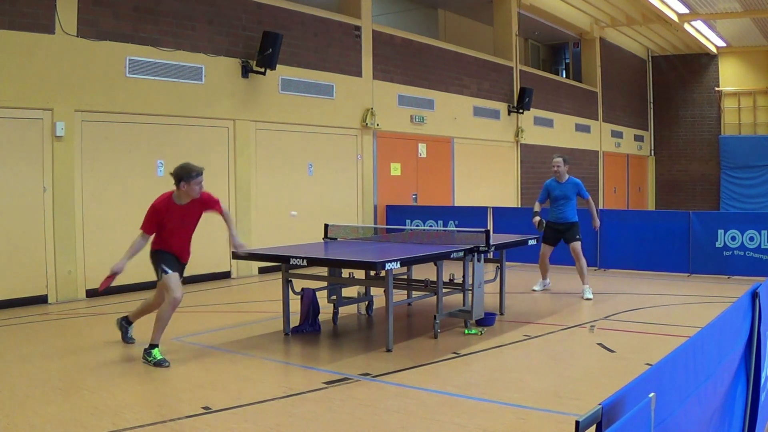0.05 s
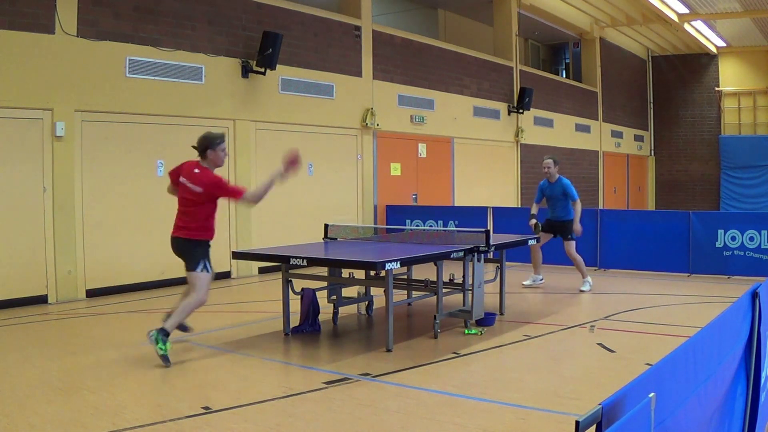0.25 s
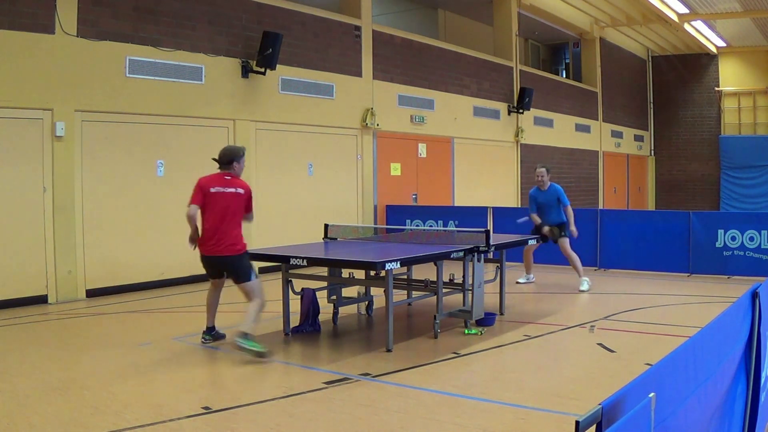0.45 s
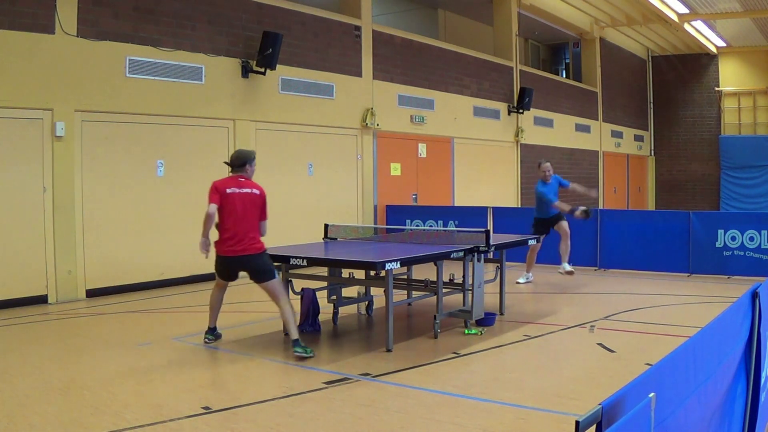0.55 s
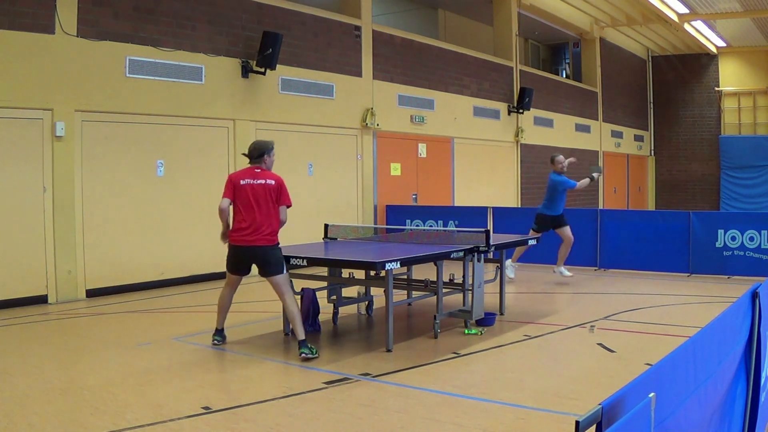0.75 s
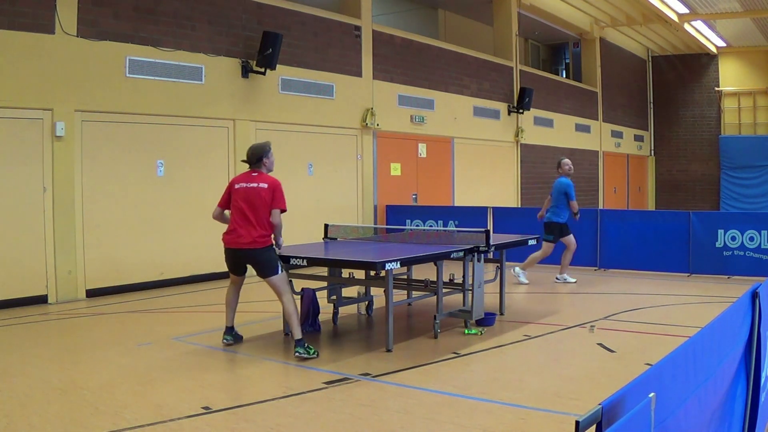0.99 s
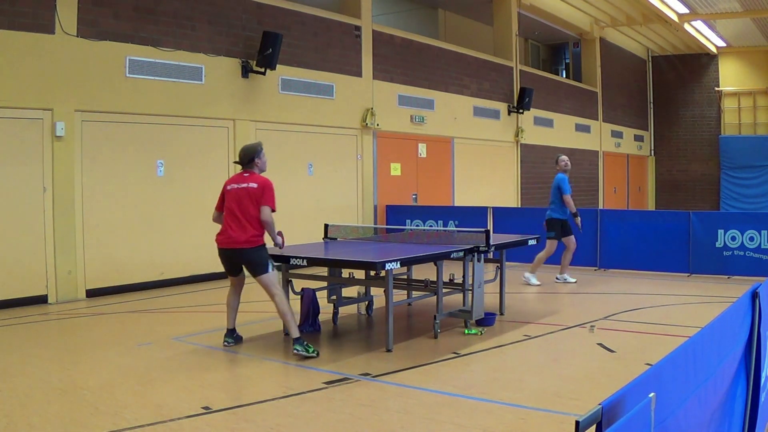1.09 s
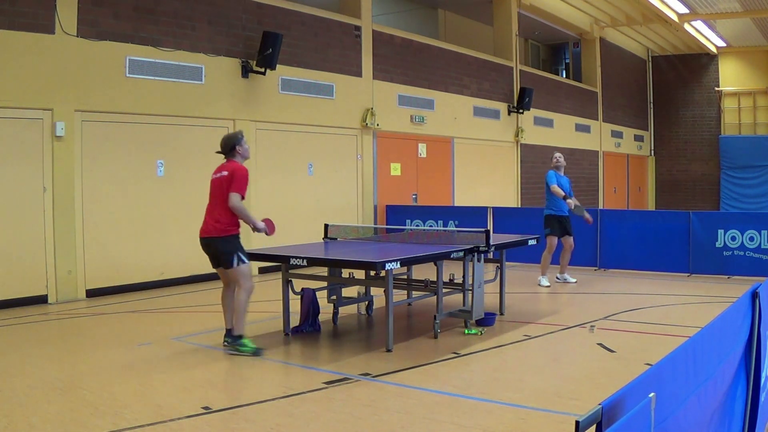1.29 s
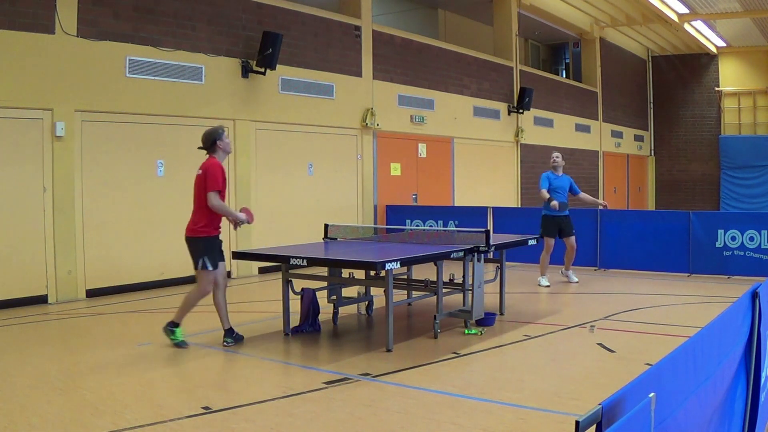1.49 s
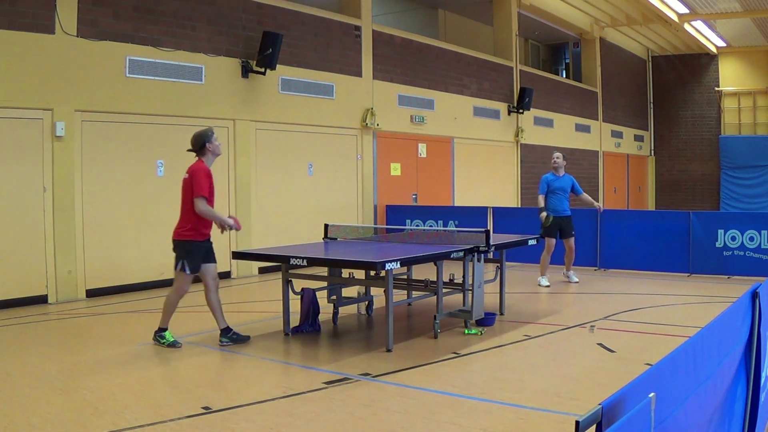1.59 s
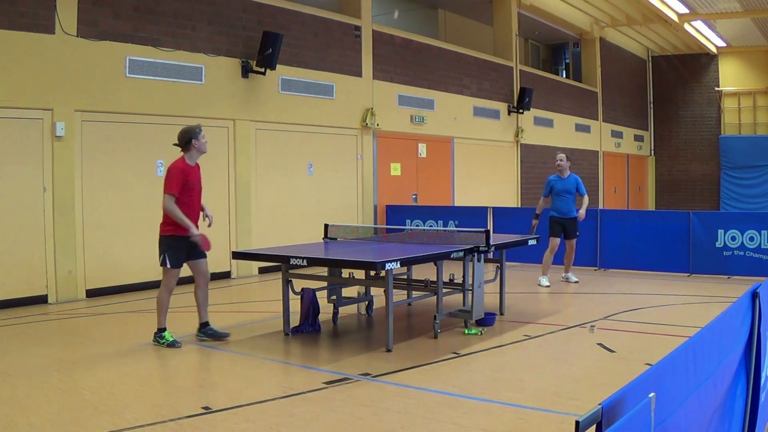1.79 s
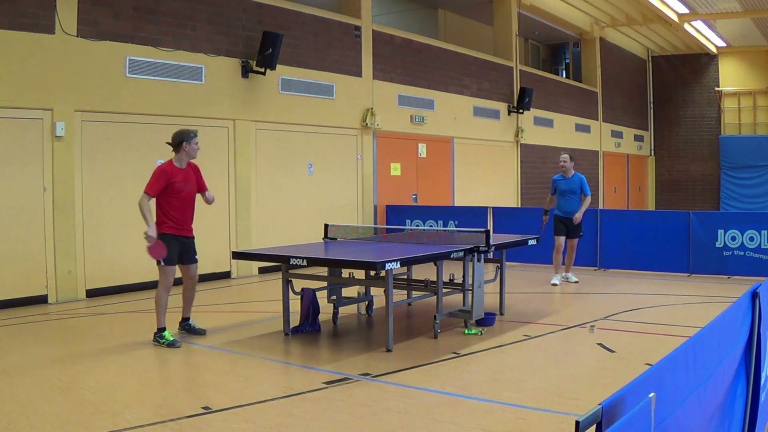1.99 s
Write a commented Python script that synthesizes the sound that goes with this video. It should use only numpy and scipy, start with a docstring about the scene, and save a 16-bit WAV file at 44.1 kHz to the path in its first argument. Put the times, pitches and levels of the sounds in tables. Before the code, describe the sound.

A table tennis ball clicks off a bat, bounces on the table and is hit back. Players' shoes squeak, scuff and land heavily on the floor, then ease into soft steps, all echoing around a sports hall.

```python
"""A table tennis ball is driven, skips off the table and is returned, in an echoing sports hall.
Each stroke rings the bat's wooden blade and the ball's shell, then slaps back off a wall.
Both players land heavily on the sprung floor; their rubber soles slap, squeak and scuff.
The hall rings on after everything, over the fading tail of earlier play, room tone and a thin whine."""
import sys
import numpy as np
from scipy import signal
from scipy.fft import rfft, irfft
from scipy.io import wavfile

SR = 44100
rng = np.random.default_rng(int(sys.argv[2]) if len(sys.argv) > 2 else 0)


def to_wav(s):
    """Save 16-bit WAV."""
    ch = np.atleast_2d(s).T  # columns
    pcm = np.round(np.clip(ch, -1, 1) * 32767)  # PCM
    wavfile.write(sys.argv[1], SR, pcm.astype(np.int16))


N = 90404
T = np.arange(N) / SR
BIN_HZ = np.fft.rfftfreq(N, 1 / SR)


def from_db(db):
    """Decibels to gain."""
    return 10 ** (np.asarray(db) / 20)


def unit_rms(x):
    """Scale to rms 1."""
    return x / np.sqrt(np.mean(x ** 2) + 1e-20)


def at_hz(curve, hz):
    """Read a curve on a log-frequency axis."""
    freqs, values = np.transpose(curve)
    return np.interp(np.log(hz + 1), np.log(freqs), values)


def noise(spectrum):
    """Steady noise of a given colour, rms 1."""
    return unit_rms(irfft(rfft(rng.standard_normal(N)) * from_db(at_hz(spectrum, BIN_HZ)), N))


def drift(rate_hz):
    """Smooth random modulation, rms 1."""
    lowpass = signal.butter(2, rate_hz, fs=SR, output="sos")
    return unit_rms(signal.sosfilt(lowpass, rng.standard_normal(N)))


def envelope(start, attack, decay):
    """Percussive rise and exponential tail."""
    age = np.maximum(T - start, 0)
    return (1 - np.exp(-age / attack)) * np.exp(-age / decay) + 1e-18


def contact(start, decay):
    """A short rough burst of force."""
    return 0.83 * envelope(start, 0.083 * decay, decay) * rng.standard_normal(N)


def resonate(x, hz, width_hz):
    """Two like resonators in series, each width_hz wide; keeps the energy of the drive."""
    radius, angle = np.exp(-np.pi * width_hz / SR), 2 * np.pi * hz / SR
    stage = [1, 0, -1, 1, -2 * radius * np.cos(angle), radius ** 2]
    return unit_rms(signal.sosfilt([stage, stage], x)) * np.sqrt(np.mean(x ** 2))


# Stereo image of the hall: (frequency [Hz], left-right correlation [0..1])
CORRELATION = [(60, .82), (130, .86), (300, .66), (600, .58), (1300, .54), (4000, .68), (10000, .72)]

def diffuse(mid, side):
    """Two unrelated noises become a stereo field, narrowest in the bass and treble."""
    alike = at_hz(CORRELATION, BIN_HZ)
    centre = rfft(mid) * np.sqrt((1 + alike) / 2)
    spread = rfft(side) * np.sqrt((1 - alike) / 2)
    return irfft(centre + spread * [[1], [-1]], N)


# Colours of the leading reverb tail and the room tone: (frequency [Hz], spectral level [dB])
TAIL_EQ = [(24, -47), (40, -10), (211, -4.5), (284, -11.5), (382, -1), (454, 1.5), (514, -4), (1230, 4),
           (4340, -20), (9840, -20), (15000, -37)]
AIR_EQ = [(18, -33), (30, 1), (288, 0.5), (978, -21), (1650, -3.5), (4310, -36), (4900, -32),
          (6360, -13), (15000, -23)]

def background(tail_db=-34, fade_db_per_s=34, air_db=-57.5, whine_hz=15625, whine_db=-67):
    """The bed: the fading ring of earlier play, the air of the hall and a faint electrical whine."""
    tail = from_db(tail_db - fade_db_per_s * T) * diffuse(noise(TAIL_EQ), noise(TAIL_EQ))
    air = from_db(air_db) * diffuse(noise(AIR_EQ), noise(AIR_EQ))
    whine = from_db(whine_db) * np.sqrt(2) * np.sin(2 * np.pi * whine_hz * T)
    return tail + air + whine


# Reverb time of the hall: (frequency [Hz], t60 [s])
HALL_T60 = [(60, 0.88), (200, 1.56), (600, 1.34), (1500, 1.68), (3000, 2.09), (5000, 1.64), (8500, 0.76),
            (14000, 0.47)]
# Tone of the reverb return: (frequency [Hz], gain [dB])
HALL_EQ = [(60, -7.5), (200, 1), (600, 5.5), (1400, 1), (2800, -1), (5000, -1.5), (8500, -4),
           (14000, -22.5)]

def hall(send, predelay_s=0.0017, build_s=0.0065):
    """Dense reflections build up, then die at their own rate in each half octave."""
    field = rfft(diffuse(*rng.standard_normal((2, N))))
    centres = np.geomspace(40, 16000, 18)
    response = np.zeros((2, N))
    for hz, weights in zip(centres, np.eye(len(centres))):
        shape = envelope(predelay_s, build_s, at_hz(HALL_T60, hz) / np.log(1000))
        band = irfft(field * np.interp(np.log(BIN_HZ + 1), np.log(centres), weights), N)
        response += band * from_db(at_hz(HALL_EQ, hz)) * shape / np.sqrt(np.sum(shape ** 2))
    return signal.fftconvolve(response, send[None], axes=1)[:, :N]


# Slides of the soles: (peak time [s], half length [s], level [dB])
SCUFFS = [(0.023, 0.021, -40), (0.25, 0.045, -36), (0.26, 0.015, -31), (0.427, 0.032, -28),
          (0.531, 0.025, -29.5), (0.64, .02, -30.5), (1.002, 0.045, -42.5), (1.145, 0.043, -41),
          (1.26, 0.096, -44), (1.455, 0.012, -50), (1.54, 0.086, -45.5), (1.67, 0.014, -71),
          (1.963, 0.029, -47), (2.04, 0.028, -48.5)]
# Colour of the friction hiss: (frequency [Hz], spectral level [dB])
SCUFF_EQ = [(300, 0), (1200, -2), (3000, -2), (5500, 0.5), (7500, -3.5), (10500, 0.5), (13000, -11),
            (16000, -22)]

def scuffs(grain_db=2, grain_hz=160, trim_db=-4.5):
    """Sliding soles hiss with a slight grain, scattered by floor and walls."""
    swell = sum(from_db(db) * np.exp(-.5 * ((T - peak) / half) ** 2) for peak, half, db in SCUFFS)
    hiss = diffuse(noise(SCUFF_EQ), noise(SCUFF_EQ))
    return swell * hiss * from_db(grain_db * drift(grain_hz) + trim_db)


# Shoe squeaks: (time [s], length [s], level [dB], start pitch [Hz], end pitch [Hz], waver [Hz],
# hall send [dB])
SQUEAKS = [(0.2634, .017, -15.5, 5190, 5150, 105, 0), (0.2870, .022, -17.5, 5090, 5090, 70, 1.5),
           (0.3900, .056, -25.5, 4330, 4290, 145, 2), (0.4090, .027, -25, 4760, 4740, 150, 0),
           (0.9965, .036, -21.5, 4890, 4910, 80, -1.5)]
# Overtones of a squeak: (harmonic [number], level [dB])
OVERTONES = [(2, -17), (3, -40)]

def squeaks(edge_s=.003, waver_rate_hz=170, chatter_hz=95, chatter_depth=0.66, trim_db=-2):
    """Rubber sticks and slips in a wavering, chattering whistle: (direct, hall send)."""
    out = np.zeros((2, N))
    for start, length, db, start_hz, end_hz, waver_hz, send_db in SQUEAKS:
        end = start + length
        hz = np.interp(T, [start, end], [start_hz, end_hz]) + waver_hz * drift(waver_rate_hz)
        phase = 2 * np.pi * np.cumsum(hz) / SR
        grip = np.clip(np.minimum(T - start, end - T) / edge_s + .5, 0, 1)
        chatter = 1 + chatter_depth * np.sin(2 * np.pi * chatter_hz * (T - start) + 0.77 * drift(90))
        tone = np.sin(phase) + sum(from_db(level) * np.sin(k * phase) for k, level in OVERTONES)
        out += np.sqrt(2) * grip * chatter * tone * from_db([[db], [db + send_db]])
    return from_db(trim_db) * out


# Landings: (time [s], thud [dB], floor boom [dB], boom pitch [Hz], sole clatter [dB], decay [s])
FOOTFALLS = [(0.349, -17.5, -25, 81, -23, 0.083), (0.376, -30.5, -20, 170.8, -31, 0.051),
             (0.494, -29.5, -36, 213, -20, 0.013), (0.553, -22, -24.5, 207.4, -47, 0.026),
             (0.8455, -29, -25.5, 111, -21, 0.071), (0.857, -52, -20, 71, -52, 0.063),
             (0.990, -34.5, -37, 60.6, -31.5, 0.017), (1.054, -40.5, -45, 185.5, -41, 0.075),
             (1.242, -50, -37.5, 54.3, -46.5, 0.07), (1.518, -41, -51, 103, -60, 0.011)]
# Weight of the thud: (frequency [Hz], spectral level [dB])
THUD_EQ = [(25, -14), (50, -12), (100, 5), (150, 3), (210, 6.5), (260, -11), (320, -7.5), (430, -5),
           (700, -13), (1500, -7), (4000, -88)]
# Bite of the clatter: (frequency [Hz], spectral level [dB])
CLATTER_EQ = [(100, 4.5), (450, -4.5), (800, -6), (1100, -5.5), (1550, 0.5), (2000, -1.5), (2500, -15),
              (3500, -9), (5500, -13.5), (8000, -23.5), (12000, -21), (16000, -63)]
# Sharp slaps and taps of the soles: (time [s], level [dB], centre [Hz], nominal width [Hz], decay [s])
SLAPS = [(0.35, -20.5, 6740, 1400, 0.0012), (0.3595, -12, 1840, 1190, .001),
         (0.8454, -22, 3970, 3050, 0.0005), (0.848, -11.5, 1300, 1171, 0.0027),
         (0.8545, -18, 2400, 1980, 0.0075), (0.8606, -21.5, 6200, 2970, 0.0072),
         (0.866, -26, 8700, 3000, 0.0026), (0.883, -16.5, 2820, 1440, 0.0065),
         (1.662, -35, 1260, 580, 0.0032)]

def footfalls(attack_s=0.00033, boom_attack_s=0.0017):
    """Landings thud and set the sprung floor booming; soles clatter and slap: (floor, soles)."""
    floor, soles = np.zeros((2, N))
    thud, clatter = noise(THUD_EQ), noise(CLATTER_EQ)
    for start, thud_db, boom_db, boom_hz, clatter_db, decay in FOOTFALLS:
        impact = envelope(start, attack_s, decay)
        boom = envelope(start, boom_attack_s, decay) * np.sin(2 * np.pi * boom_hz * (T - start))
        floor += from_db(thud_db) * impact * thud + from_db(boom_db) * boom
        soles += from_db(clatter_db) * impact * clatter
    for start, db, hz, width, decay in SLAPS:
        soles += from_db(db) * resonate(contact(start, decay), hz, 2 * width)
    return floor, soles


CONTACT_DECAY_S = 0.0021

def strike(start, modes):
    """The ball's impact rings a set of modes: (direct, hall send)."""
    out = np.zeros((2, N))
    for hz, db, t60, send_db in modes:
        width_hz = 2.69 * np.log(1000) / np.pi / t60
        ring = resonate(contact(start, CONTACT_DECAY_S), hz, width_hz)
        ring = unit_rms(ring) * np.sqrt(0.0046 / T[-1])   # the energy of 4.6 ms at rms 1
        out += ring * from_db([[db], [db + send_db]])
    return out


# Knock of the wooden blade: (pitch multiple [ratio], level [dB], nominal t60 [s], hall send [dB])
BLADE_MODES = [(0.371, -8.5, 0.0066, 11.5), (.52, -7.5, 0.0071, 3.5), (1, -3.5, 0.0098, 2.5),
               (1.16, -8.5, 0.0034, 5)]
# Ping of the ball's shell: (frequency [Hz], level [dB], nominal t60 [s], hall send [dB])
SHELL_MODES = [(7000, -11, 0.002, -2), (8440, -8.5, .010, 7.5), (9750, -11, 0.0093, -1),
               (10950, -7.5, 0.0025, 12)]
# Bat strokes: (time [s], blade [dB], shell [dB], blade pitch [Hz], hall send [dB], wall echo delay [s],
# echo blade [dB], echo shell [dB])
STROKES = [(0.2197, -16, -15, 2724, 1, 0.0221, -20.5, -27),
           (0.6145, -22, -22.5, 2564, 3, .0172, -18.5, -26.5)]

def ball(bounce_s=.4252, bounce_db=-20.5, crack_db=-30, band_hz=(560, 11600)):
    """Strokes ring blade and shell, with a wall slapback; the bounce rings only the shell."""
    out = from_db(bounce_db) * strike(bounce_s, SHELL_MODES)   # rows: direct, hall send
    for start, blade_db, shell_db, pitch, send_db, delay, echo_blade_db, echo_shell_db in STROKES:
        blade = [(pitch * ratio, db, t60, send) for ratio, db, t60, send in BLADE_MODES]
        wood = strike(start, blade) + from_db(crack_db) * contact(start, CONTACT_DECAY_S)
        hit = from_db(blade_db) * wood + from_db(shell_db) * strike(start, SHELL_MODES)
        out += hit * from_db([[0], [send_db]])
        slapback = from_db(echo_blade_db) * strike(start + delay, blade)
        slapback += from_db(echo_shell_db) * strike(start + delay, SHELL_MODES)
        out[0] += slapback[0]   # no hall send
    return signal.sosfilt(signal.butter(4, band_hz, "band", fs=SR, output="sos"), out)


def scene(floor_send_db=-1.5):
    """Mix ball and shoes, direct and through the hall, over the bed."""
    floor, soles = footfalls()
    sliding = scuffs()
    direct, send = ball() + squeaks() + soles
    send = send + from_db(floor_send_db) * floor + sliding.mean(axis=0)
    return direct + floor + sliding + hall(send) + background()


# Imbalance of the two microphone ports: (frequency [Hz], left minus right [dB])
PORT_BALANCE = [(70, 6.3), (190, 4), (450, 1), (1200, -.3), (5000, -.4)]
# Phase between the ports: (frequency [Hz], left lead [rad])
PORT_PHASE = [(70, -.25), (190, -.7), (450, -.72), (1200, -.42), (3500, -.15), (9000, 0)]

def record(dry, low_cut_hz=28.5, high_cut_hz=15900):
    """Microphone chain: two unequal ports, low cut, soft-clipped peaks, steep high cut."""
    hz, sides = np.fft.rfftfreq(2 * N, 1 / SR), np.array([[.5], [-.5]])
    ports = from_db(sides * at_hz(PORT_BALANCE, hz)) * np.exp(1j * sides * at_hz(PORT_PHASE, hz))
    heard = irfft(rfft(dry, 2 * N) * ports)[:, :N]
    heard = signal.sosfilt(signal.butter(4, low_cut_hz, "high", fs=SR, output="sos"), heard)
    rounded = 0.74 * np.tanh(heard / 0.64)
    return signal.sosfilt(signal.ellip(10, .2, 80, high_cut_hz, fs=SR, output="sos"), rounded)


dry = scene()
out = record(dry)
to_wav(out)
```